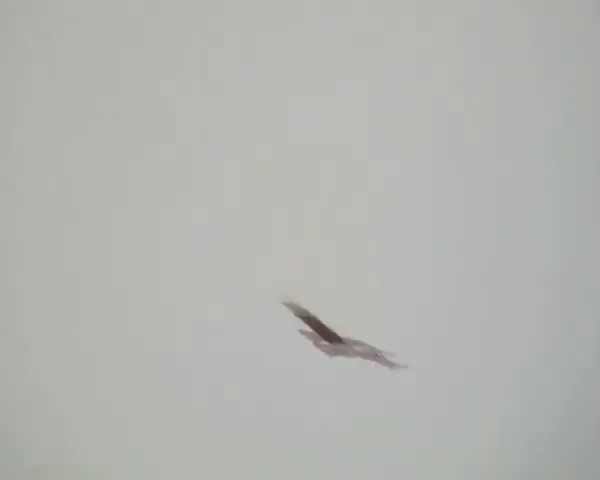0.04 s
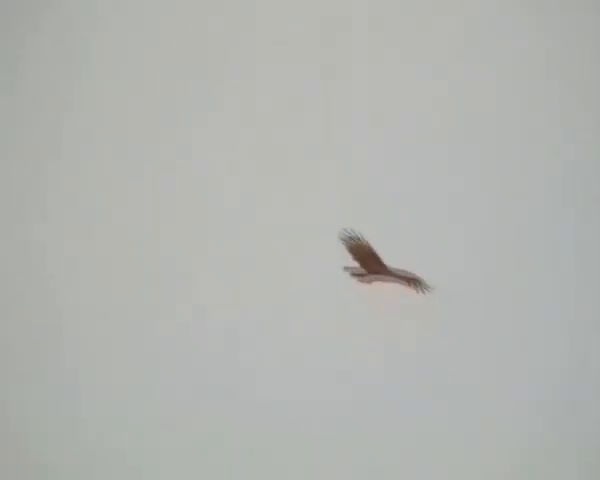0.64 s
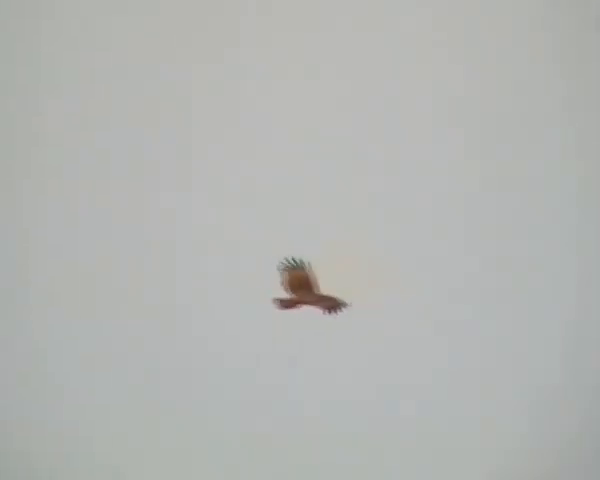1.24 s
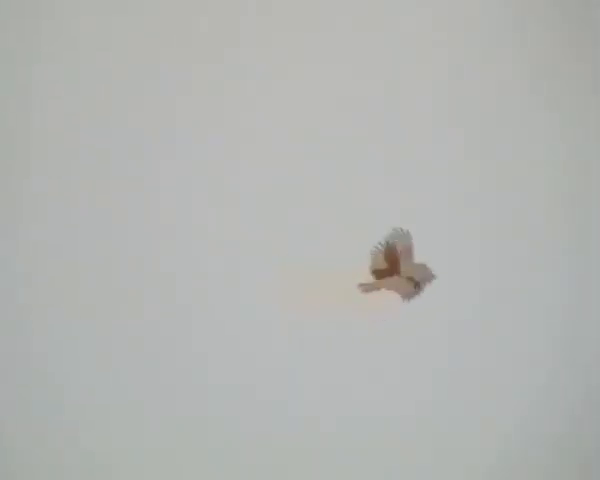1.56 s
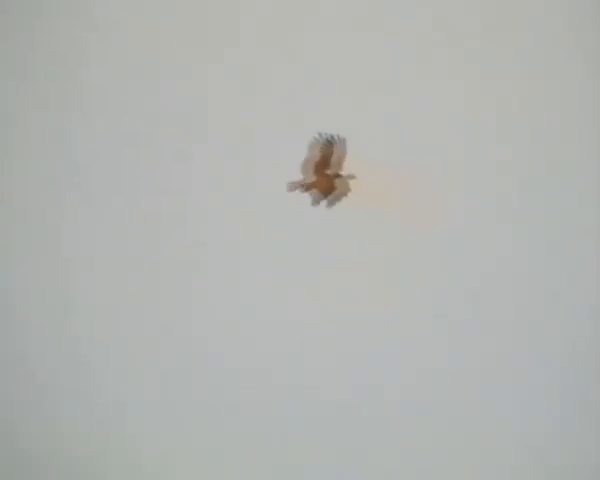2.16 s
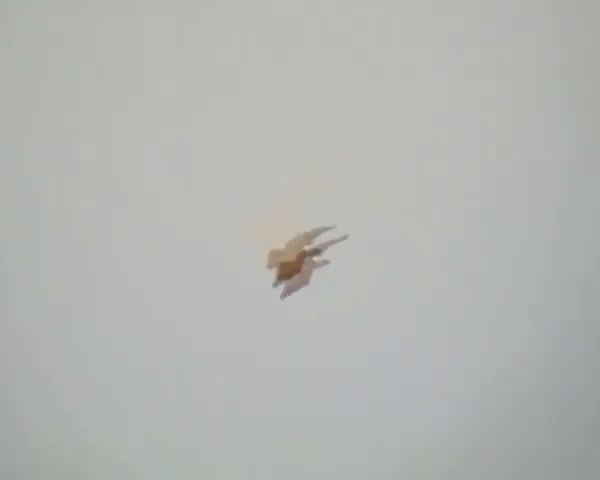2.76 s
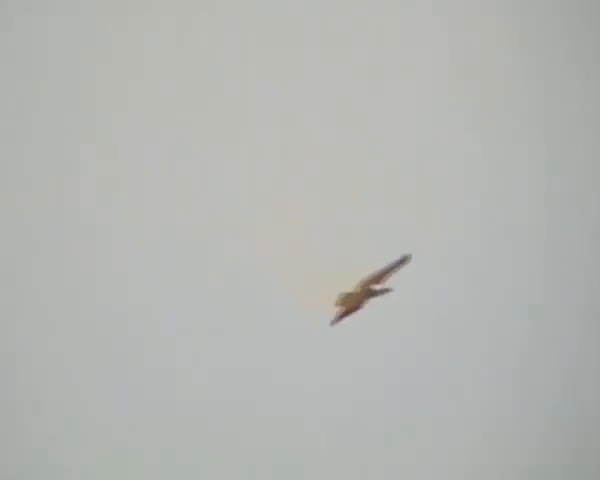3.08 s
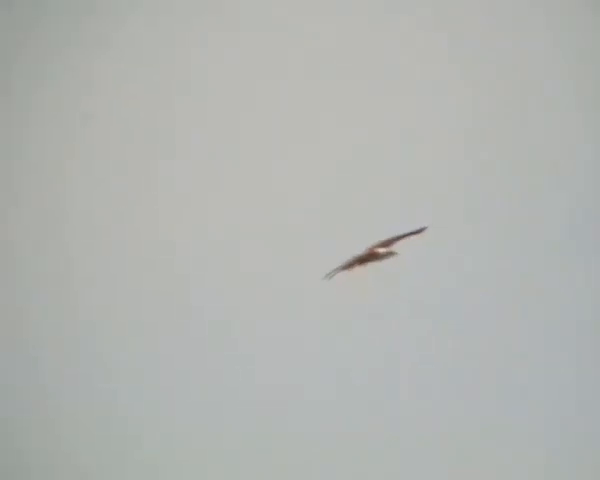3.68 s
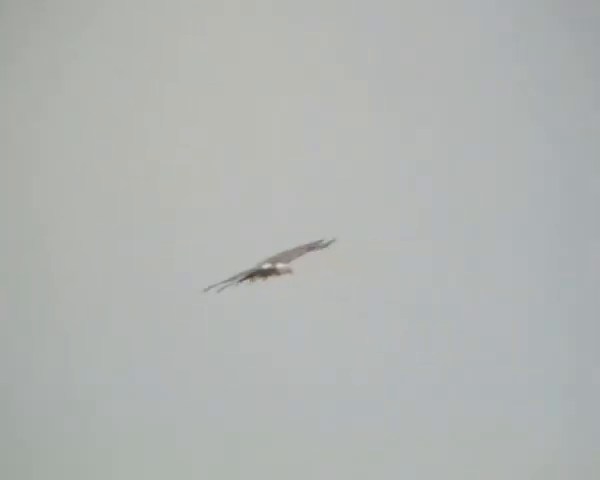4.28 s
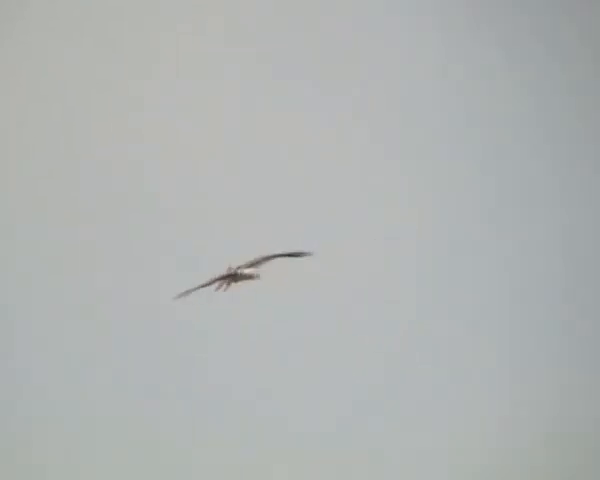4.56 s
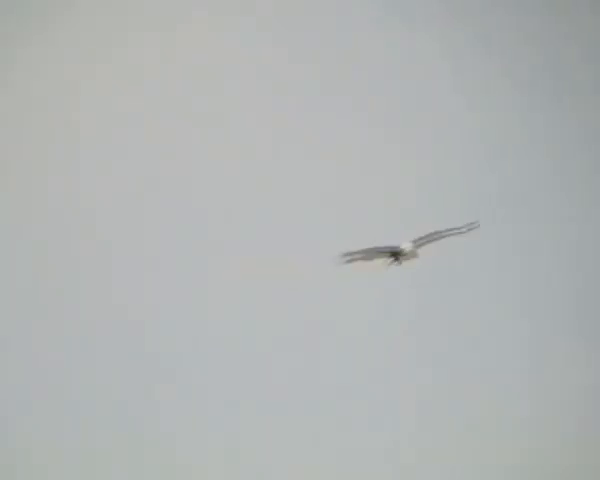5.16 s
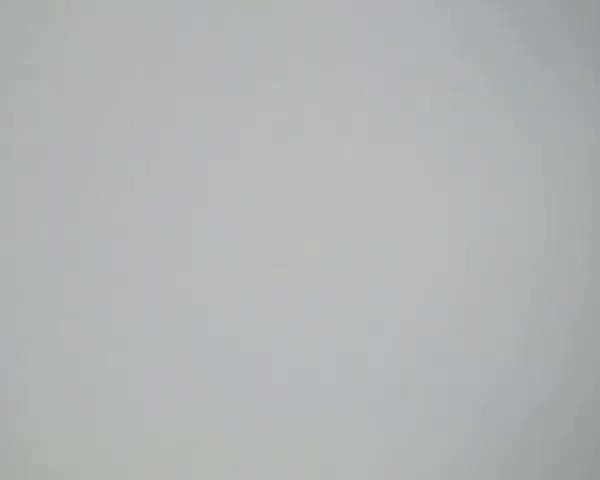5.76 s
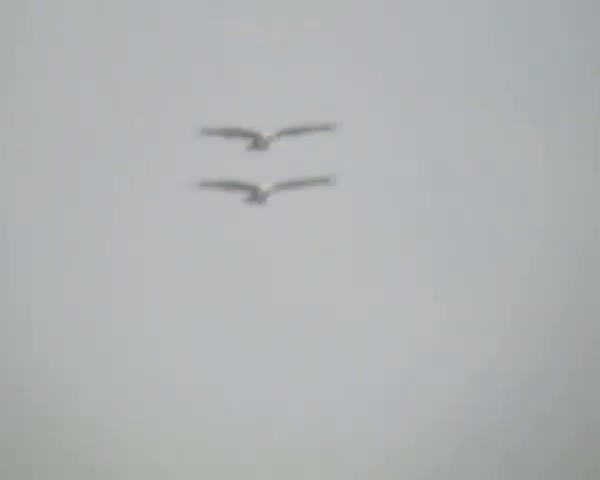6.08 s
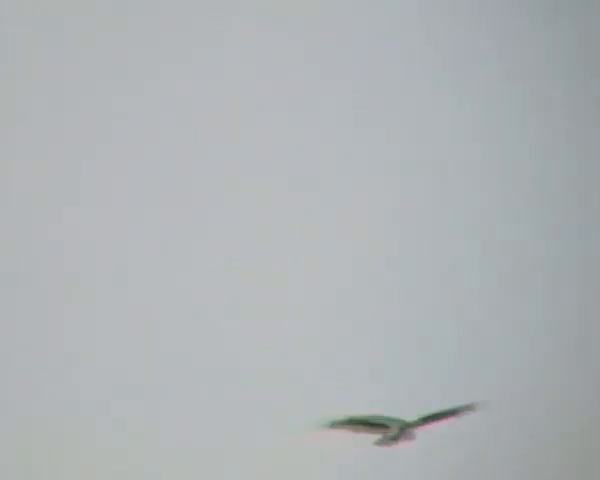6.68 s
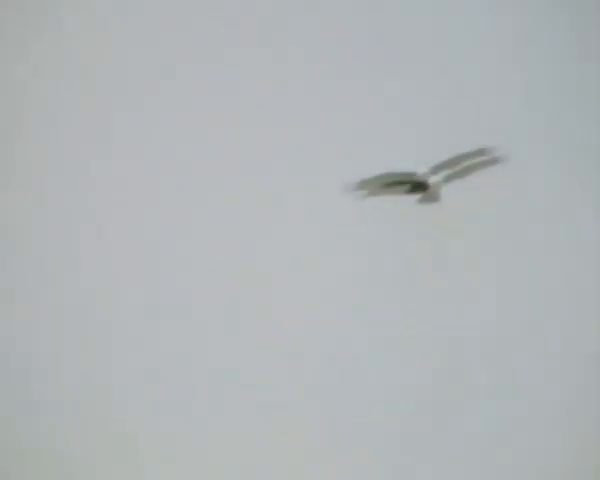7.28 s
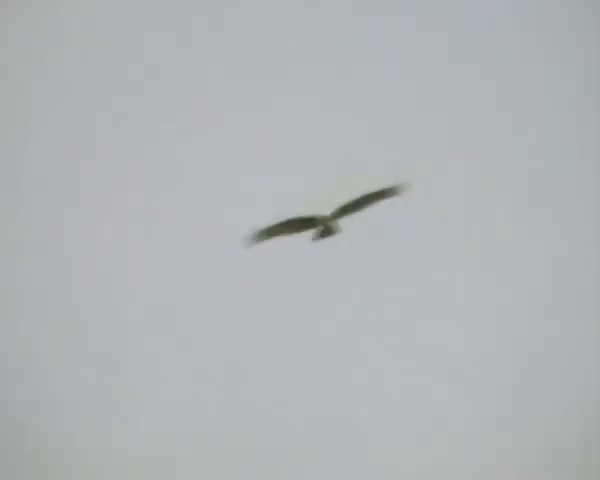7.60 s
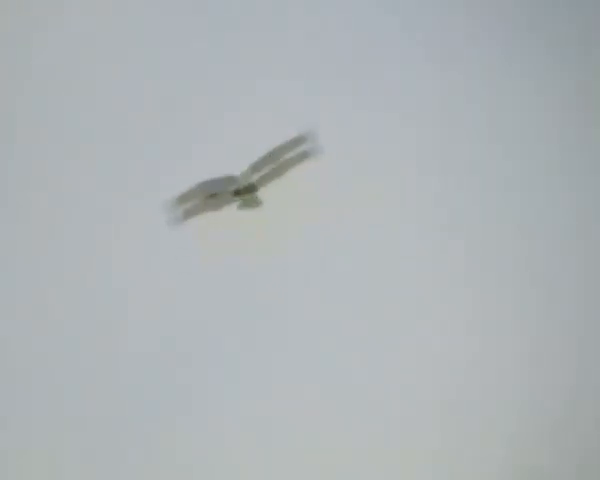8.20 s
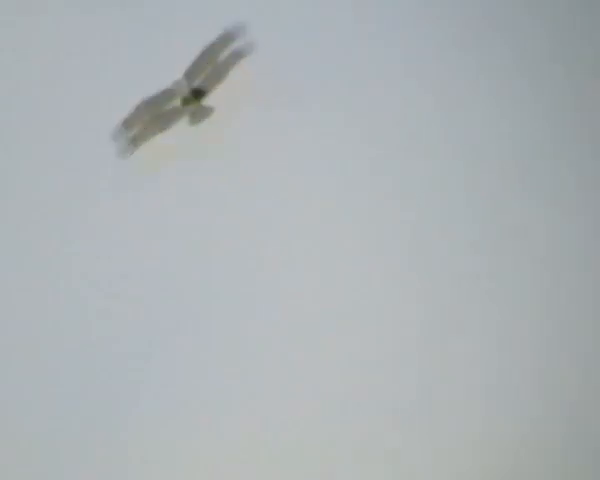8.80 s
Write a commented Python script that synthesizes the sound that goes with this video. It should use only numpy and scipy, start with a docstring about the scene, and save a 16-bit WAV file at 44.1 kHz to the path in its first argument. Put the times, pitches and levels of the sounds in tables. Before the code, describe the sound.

Wind rushes steadily over open country for about nine seconds, with a low rumble and soft buffeting on a hand-held microphone. A brief bright hiss at the very start stops short as the rumble builds. Two small, close knocks come at about 0.7 and 0.9 seconds, the second with a light scuff. Far away, a bird gives three faint, short, falling whistles with a slight echo, at about 0.2, 2 and 4.4 seconds. From around 3 seconds a mild gust passes and a breeze lifts the soft hiss of distant leaves, holding until nearly 7 seconds. Faint hollow moans and puffs drift through the wind. There is a slight scuff near 5.6 seconds and a very soft rustle around 7.3. The rumble gradually eases, while the airy rush continues to the end.

```python
"""Wind over open country

Moving air rushes steadily past a hand-held camera and buffets its two close microphone ports.
The low rumble eases off as a breeze lifts the hiss of distant leaves; far away a bird gives three
falling whistles. Close by are a few ticks and scuffs. The camera has shallow notches against motor hum."""
import sys
import numpy as np
from scipy import signal
from scipy.fft import rfft, irfft
from scipy.io import wavfile
from scipy.ndimage import uniform_filter1d

SR = 44100
rng = np.random.default_rng(int(sys.argv[2]) if len(sys.argv) > 2 else 0)


def file_out(sig):
    """Save sig as 16-bit WAV at sys.argv[1]."""
    # one column per channel
    cols = np.atleast_2d(sig).T
    # limit, then scale
    lim = np.clip(cols, -1, 1)
    pcm = np.round(lim * 32767).astype(np.int16)
    wavfile.write(sys.argv[1], SR, pcm)


N = 398663
TIME, HZ = np.arange(N) / SR, np.fft.rfftfreq(N, 1 / SR)


def gain_of(db):
    """Decibels to amplitude."""
    return 10 ** (np.asarray(db) / 20)


def unit_rms(x):
    """Scales to rms 1."""
    return x / np.sqrt(np.mean(x ** 2) + 1e-20)


def bell(x, width):
    """Gaussian curve: 1 at zero, 1/e one width to either side."""
    return np.exp(-(x / width) ** 2)


def curve_at(points, hz):
    """Interpolates a table on a log-frequency axis."""
    f, value = np.transpose(points)
    return np.interp(np.log(hz + 1), np.log(f + 1), value)


def swell(start_s, attack_s, hold_s, release_s):
    """A rounded envelope from 0 to 1 and back."""
    ramp = np.interp(TIME, start_s + np.cumsum([0, attack_s, hold_s, release_s]), [0, 1, 1, 0])
    return np.sin(np.pi / 2 * ramp) ** 2


def wander(slow_hz=.6, fast_hz=2.5, count=20):
    """The unsteadiness of moving air: a slow random drift of rms 1."""
    t, rates = TIME[::512], np.geomspace(slow_hz, fast_hz, count)
    drift = sum(np.sin(2 * np.pi * (rate * t + rng.random())) / np.sqrt(rate) for rate in rates)
    return np.interp(TIME, t, unit_rms(drift))


# likeness of the two ports: (frequency [Hz], coherence [0-1])
PORT_COHERENCE = [(60, 0.97), (130, 0.97), (210, 0.66), (320, 0.79), (650, 0.82), (1400, 0.87),
                  (2500, 0.71), (3800, 0.73), (5500, 0.51), (7000, 0.37)]
# left port over right: (frequency [Hz], level [dB])
PORT_BALANCE = [(60, -1.5), (210, -1), (380, 0.6), (700, 4), (1300, 4.5), (3200, 4), (5000, 1),
                (8000, -0.5)]
# left port ahead of right: (frequency [Hz], phase [rad])
PORT_LEAD = [(80, 0.11), (260, 0.22), (600, 0.73), (760, 0.15), (1100, 0.61), (1400, .33), (3500, 0.29),
             (6000, 1), (7500, .1)]
def air(spectrum, patchy_db, size=2048):
    """Turbulent noise with drifting patches, as the two ports hear it; their mean has rms 1."""
    hop, hz = size // 4, np.fft.rfftfreq(size, 1 / SR)
    a, b, c, d, patches = rng.standard_normal((5, N // hop + 5, len(hz)))
    patches = unit_rms(uniform_filter1d(uniform_filter1d(patches, size=10, axis=0), size=18, axis=1))
    coherence = curve_at(PORT_COHERENCE, hz)
    left = a + 1j * b
    right = coherence * left + np.sqrt(1 - coherence ** 2) * (c + 1j * d)
    right *= np.exp(-1j * curve_at(PORT_LEAD, hz))
    lean = gain_of(curve_at(PORT_BALANCE, hz) / 2)
    frames = np.array([left * lean, right / lean]) * gain_of(curve_at(spectrum, hz) + patchy_db * patches)
    ports = signal.istft(np.swapaxes(frames, 1, 2), nperseg=size, noverlap=size - hop)[1][:, :N]
    return ports / np.std(ports.mean(0))


# bird calls: (time [s], length [s], crest hold [s], time to fall halfway [s], scoop [Hz], base level [dB])
WHISTLES = [(0.24, .235, .043, .088, 480, -58.3), (2.045, .185, .028, .044, 20, -60.6),
            (4.355, .145, .062, .034, 60, -56.8)]
def distant_bird(crest_hz=2750, low_hz=1730, scoop_s=.014, flutter_hz=60, echo_db=-7, echo_t60_s=.6):
    """Far off, each whistle scoops up and slides down; air makes it flutter and the land echoes it."""
    song = np.zeros(N)
    for start, length, hold, fall, scoop_hz, db in WHISTLES:
        t = np.clip(TIME - start, 0, length)
        height = 1 / (1 + (np.maximum(t - hold, 0) / fall) ** 2)
        hz = low_hz + (crest_hz - low_hz) * height - scoop_hz * np.exp(-t / scoop_s)
        attack = np.minimum(t / .03, 1)
        fade = np.minimum((1 - t / length) / .4, 1)
        carry_db = 2.7 * (2.5 - height)  # lower pitches carry better over the distance
        song += attack * fade * gain_of(db + carry_db) * np.sqrt(2) * np.sin(2 * np.pi * np.cumsum(hz) / SR)
    flutter = signal.sosfilt(signal.butter(2, flutter_hz, fs=SR, output="sos"), rng.standard_normal(N))
    song *= 1 + .25 * unit_rms(flutter)
    tail = rng.standard_normal((2, SR)) * gain_of(-60 * TIME[:SR] / echo_t60_s)
    echo = signal.fftconvolve(song[None], tail / np.linalg.norm(tail[0]), axes=1)[:, :N]
    return (song + gain_of(echo_db) * echo) * gain_of([[1.5], [-2]])


# foliage spectrum: (frequency [Hz], relative level [dB])
LEAF_SPECTRUM = [(500, -18.5), (1500, 2), (2900, 7), (3900, 0.5), (5700, -7), (7400, -16.5), (8200, -67.5),
                 (12000, -60)]
def distant_leaves(breeze, base_db=-55.5, grow_db_per_s=.1359, lift_db=2.5):
    """Far leaves hiss in the breeze and grow slowly more restless."""
    db = base_db + grow_db_per_s * TIME + lift_db * breeze
    return air(LEAF_SPECTRUM, patchy_db=1.14) * gain_of(db + .17 * wander())


# small impacts: (time [s], level [dB], pitch [Hz], half length [s])
TICKS = [(.3495, -43, 5750, .0005), (0.738, -25.2, 745, 0.0023), (0.856, -27, 1090, .0006),
         (3.991, -52, 5900, .0006)]
def ticks():
    """Ticks and knocks near the microphone, each a few cycles long."""
    out = np.zeros(N)
    for time, db, pitch_hz, half_s in TICKS:
        t = TIME - time
        out += gain_of(db) * bell(t, half_s) * np.sin(2 * np.pi * pitch_hz * t)
    return out * gain_of([[1], [-1]])


# soft rustles: (time [s], level [dB], centre [Hz], half length [s])
SCUFFS = [(0.858, -46, 1950, 0.024), (2.315, -59, 3600, 0.023), (5.6, -54, 2900, 0.053),
          (7.35, -60.5, 3500, .55)]
def scuffs(relative_width=.34):
    """Scuffs and rustles near the microphone: puffs of band noise."""
    out = np.zeros(N)
    for time, db, centre_hz, half_s in SCUFFS:
        band = irfft(rfft(rng.standard_normal(N)) * bell(HZ / centre_hz - 1, relative_width), N)
        out += gain_of(db) * bell(TIME - time, half_s) * unit_rms(band)
    return out * gain_of([[1], [-1]])


# bright hiss spectrum: (frequency [Hz], relative level [dB])
HISS_SPECTRUM = [(500, -21), (1100, -12.5), (1600, 3.5), (2800, -2.5), (3400, -5.5), (5500, -12),
                 (8000, -22.5), (11000, -28.5), (15000, -36.5), (16000, -59)]
def hiss(db=-42, stop_s=.171, fall_db_per_s=3998):
    """A bright hiss rides on the wind for a moment and stops short."""
    fall_db = fall_db_per_s * np.maximum(TIME - stop_s, 0)
    return air(HISS_SPECTRUM, patchy_db=0) * gain_of(db - fall_db)


# gust spectrum: (frequency [Hz], relative level [dB])
GUST_SPECTRUM = [(1000, -17.5), (2200, 1), (2800, 10.5), (3300, -0.5), (4500, -24.5), (8000, -57)]
def gust(db=-55):
    """One gust passes closer, at the front of the breeze."""
    envelope = swell(start_s=2.9, attack_s=.99, hold_s=.3, release_s=1.5)
    return air(GUST_SPECTRUM, patchy_db=1.5) * gain_of(db) * envelope


# moans, puffs and a low swell: (time [s], half length [s], centre [Hz], half width [Hz], level [dB])
WIND_SWELLS = [(0.827, 0.09, 795, 242, -42.5), (1.401, 0.94, 962, 70, -48.5), (2.5, 0.1, 848, 200, -44),
               (2.498, 0.24, 170, 90, -49), (4.498, 1, 380, 55.6, -49), (5.1, .5, 498.5, 70, -48),
               (6.151, 0.45, 1376, 110, -50.5), (7.078, .1, 847, 160, -44)]
def wind_swells(drift=.03):
    """Hollow moans, brief broad puffs and a low swell of wind, a little left; air speed bends their pitch."""
    out = np.zeros(N)
    for time, half_s, centre_hz, width_hz, db in WIND_SWELLS:
        flicker = irfft(rfft(rng.standard_normal((2, N))) * bell(HZ, width_hz), N)
        phase = 2 * np.pi * np.cumsum(centre_hz * (1 + drift * wander())) / SR
        band = flicker[0] * np.cos(phase) + flicker[1] * np.sin(phase)
        out += gain_of(db) * bell(TIME - time, half_s) * unit_rms(band)
    return out * gain_of([[1.8], [-2.2]])


# eddy pressure spectrum: (frequency [Hz], relative level [dB])
BUFFET_SPECTRUM = [(10, -38.5), (22, -17), (34, -9), (52, -0.5), (70, -1.5), (110, -10.5), (250, -45),
                   (1000, -91)]
def buffet(db=-49.5, start_s=.04, attack_s=.34, lumpy_db=1.2):
    """Right at the microphone, eddies press on the ports in slow, deep lumps."""
    onset = np.clip((TIME - start_s) / attack_s, 0, 1) ** 2
    return air(BUFFET_SPECTRUM, patchy_db=.6, size=4096) * onset * gain_of(db + lumpy_db * wander())


# low wind spectrum: (frequency [Hz], relative level [dB])
RUMBLE_SPECTRUM = [(20, -39), (45, -17), (70, -5), (115, 2), (220, 0), (380, -3.5), (700, -16.5),
                   (2000, -37), (6000, -89)]
def wind_rumble(breeze, base_db=-37.5, build_db=3, build_s=.46, ease_db_per_s=.5, lift_db=.7):
    """The low wind builds quickly, then eases off; the breeze lifts it a little."""
    db = base_db - ease_db_per_s * TIME + lift_db * breeze
    db -= build_db * np.maximum(1 - TIME / build_s, 0)
    return air(RUMBLE_SPECTRUM, patchy_db=.63, size=4096) * gain_of(db - .38 * wander())


# midrange wind spectrum: (frequency [Hz], relative level [dB])
RUSH_SPECTRUM = [(100, -29.5), (300, -7), (500, -0.5), (640, -1.46), (720, 0), (860, -0.6), (1000, -3.5),
                 (1180, -6.5), (1450, -6), (1750, -11.5), (2400, -17.5), (3500, -30), (6000, -52.5),
                 (9000, -88)]
def wind_rush(breeze, base_db=-39, ease_db_per_s=.093, lift_db=1.5):
    """The broad rush of air over open ground, nearly steady, rising with the breeze."""
    db = base_db - ease_db_per_s * TIME + lift_db * breeze
    return air(RUSH_SPECTRUM, patchy_db=.9) * gain_of(db - .02 * wander())


def scene():
    """Everything that reaches the two ports; one long breeze lifts rumble, rush and leaves together."""
    breeze = swell(start_s=3.17, attack_s=.62, hold_s=2.8, release_s=1.8)
    wind = wind_rumble(breeze) + wind_rush(breeze) + distant_leaves(breeze) + gust()
    return wind + buffet() + wind_swells() + hiss() + distant_bird() + ticks() + scuffs()


# colour of the camera housing: (frequency [Hz], gain [dB])
HOUSING_RESPONSE = [(1750, 0), (2020, 1), (2200, 1), (2400, -2), (2560, 0.7), (2800, -0.5), (3100, 0)]
def record(dry, hum_hz=149.8, depth=.43, notch_hz=11, reach_hz=3600, thin_hiss_db=-80, cutoff_hz=15800):
    """Housing colour, hum notches, a very faint, steady, thin hiss near 15 kHz, then a band limit."""
    harmonic = np.maximum(np.round(HZ / hum_hz), 1)
    notches = bell(HZ - hum_hz * harmonic, notch_hz) * (harmonic != 5)  # the fifth is left open
    comb = 1 - depth * notches * bell(HZ, reach_hz)  # shallower toward the treble
    sound = irfft(rfft(dry) * comb * gain_of(curve_at(HOUSING_RESPONSE, HZ)), N)
    thin_hiss = irfft(rfft(rng.standard_normal((2, N))) * bell(HZ - 15300, 700), N)
    lowpass = signal.firwin(511, cutoff_hz, window=("kaiser", 9), fs=SR)
    return signal.oaconvolve(sound + gain_of(thin_hiss_db) * unit_rms(thin_hiss), lowpass[None], "same")


dry = scene()
out = record(dry)
file_out(out)
```